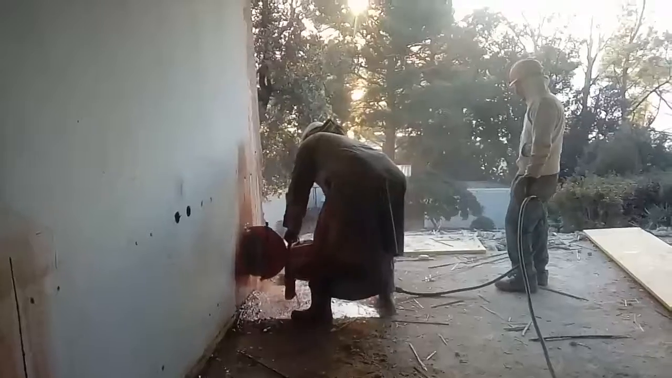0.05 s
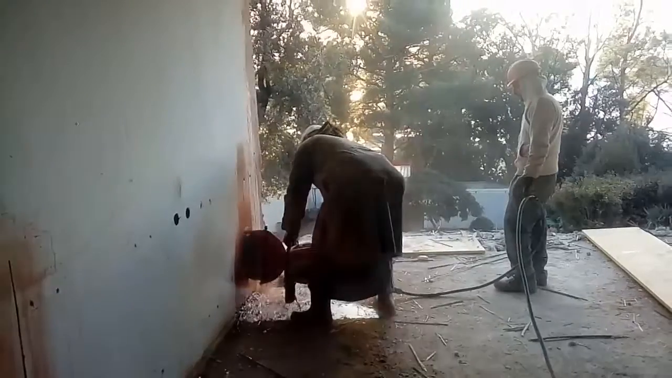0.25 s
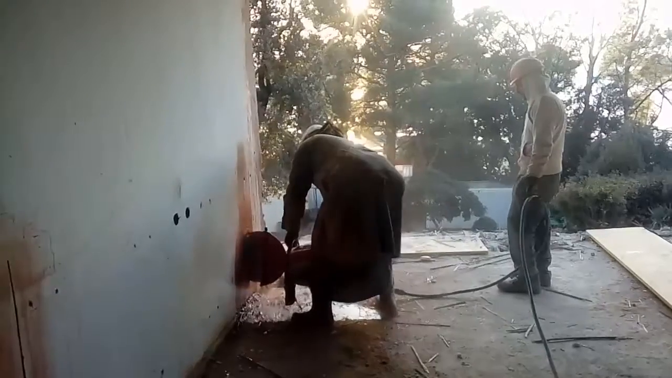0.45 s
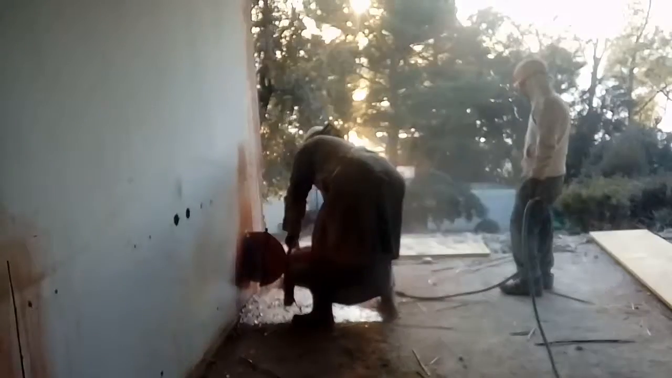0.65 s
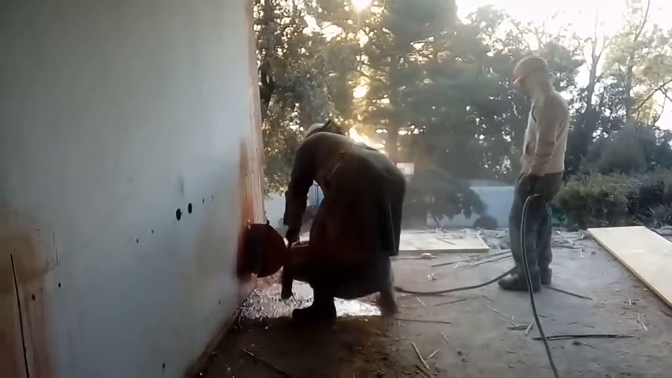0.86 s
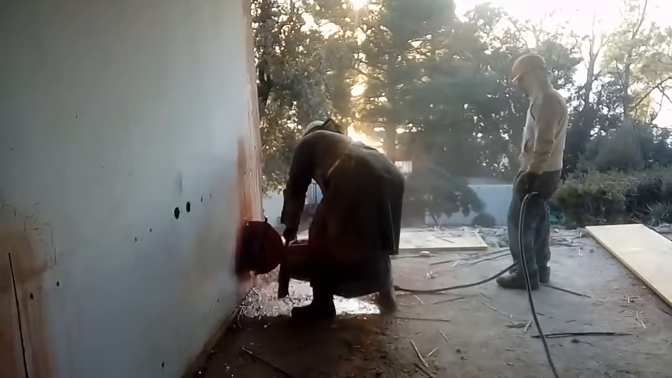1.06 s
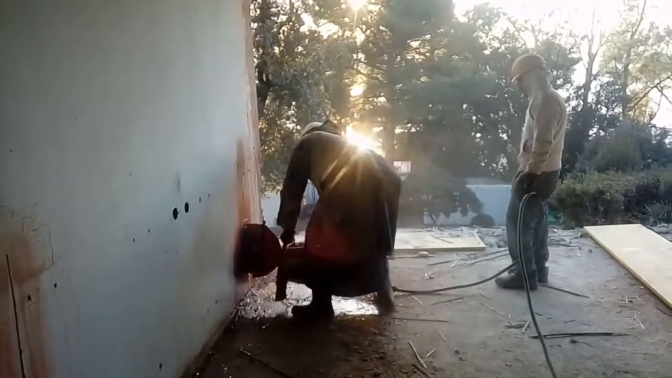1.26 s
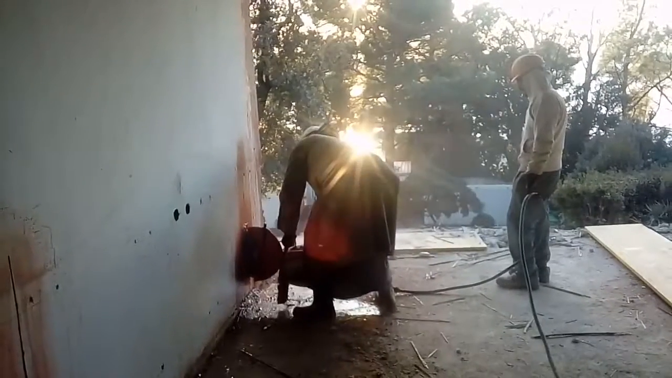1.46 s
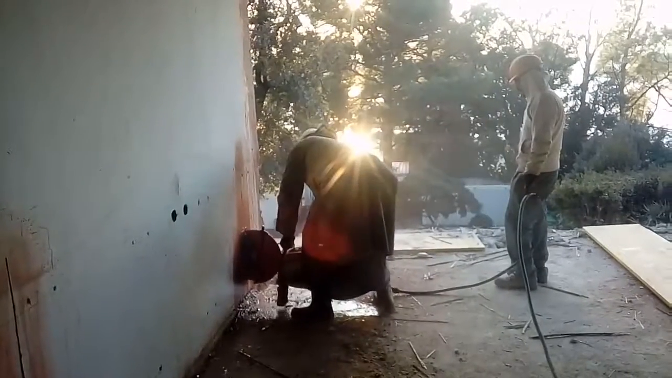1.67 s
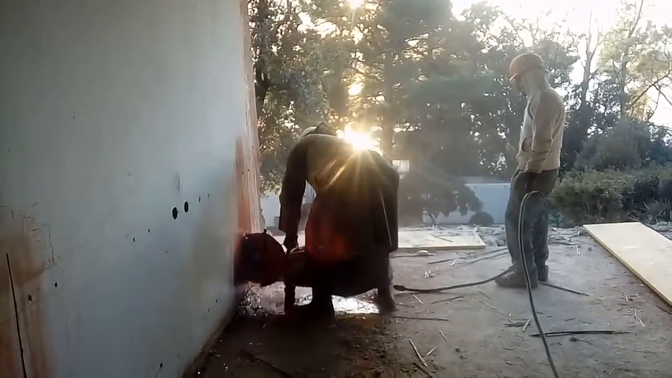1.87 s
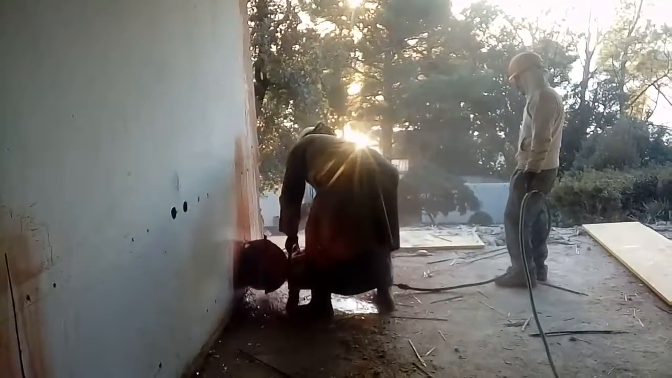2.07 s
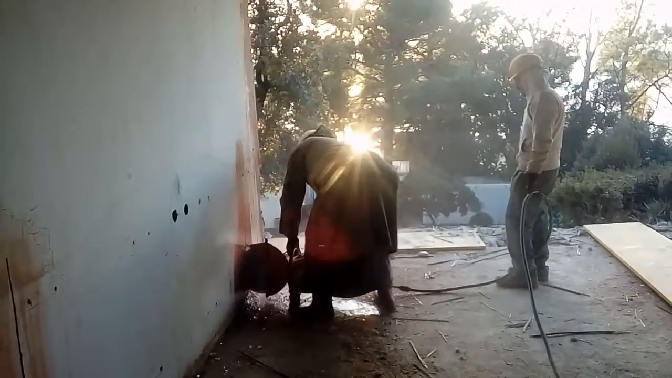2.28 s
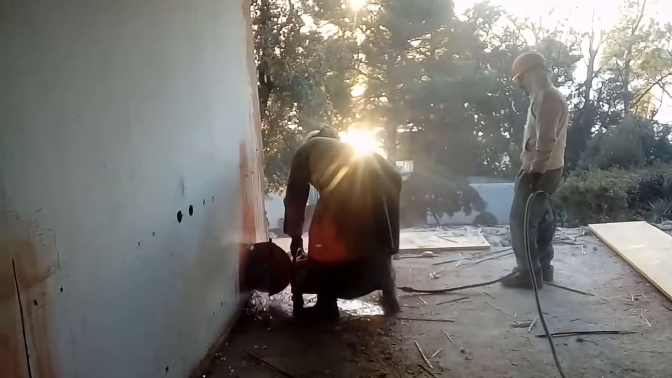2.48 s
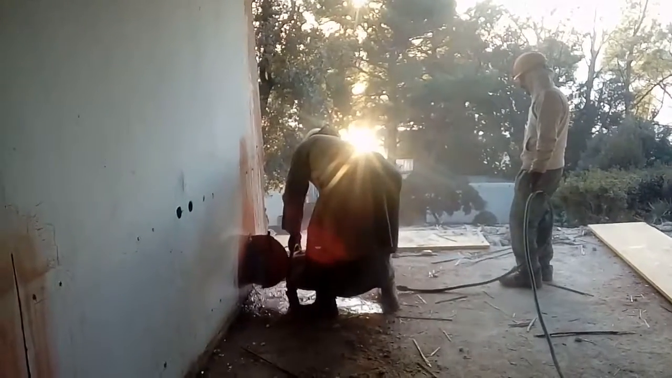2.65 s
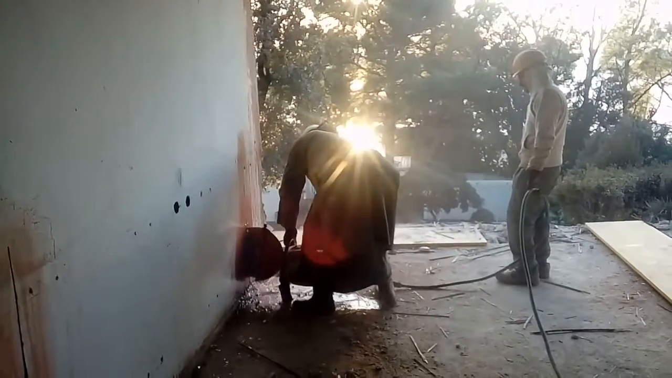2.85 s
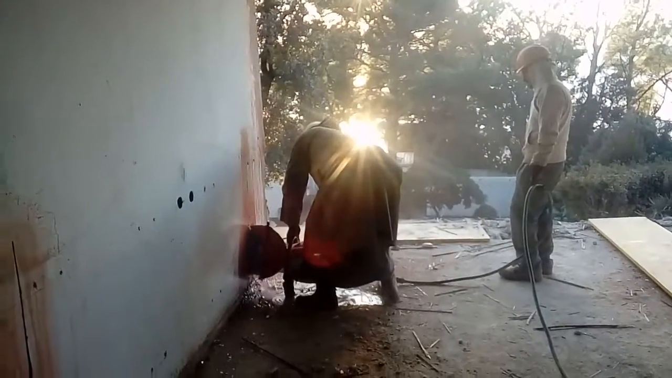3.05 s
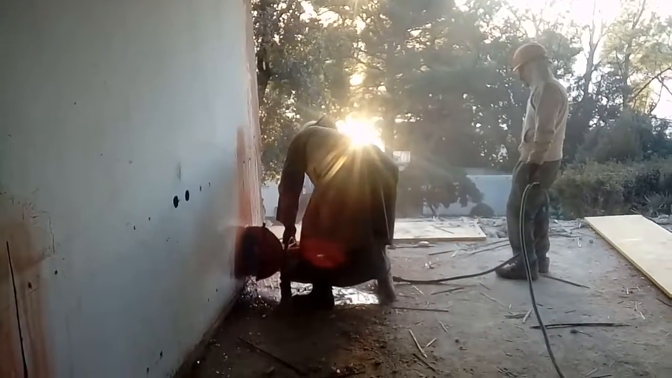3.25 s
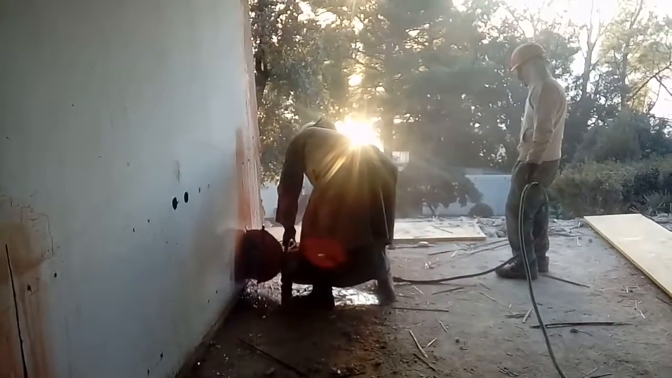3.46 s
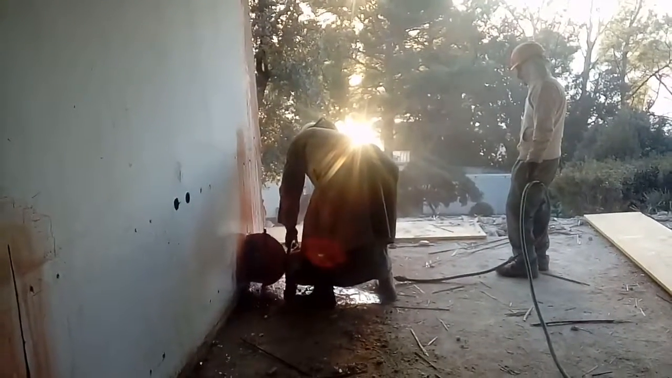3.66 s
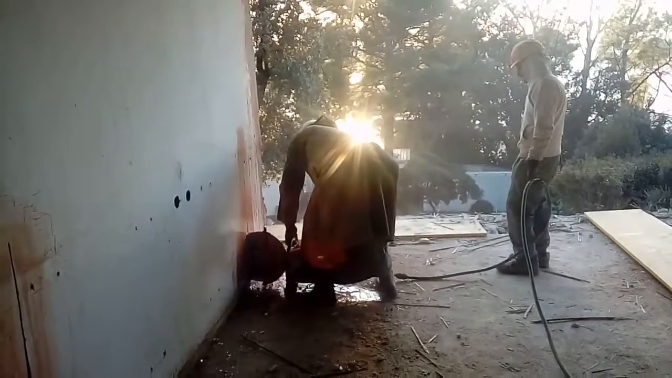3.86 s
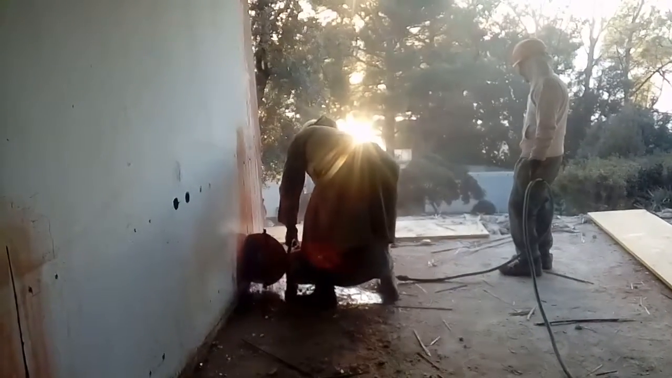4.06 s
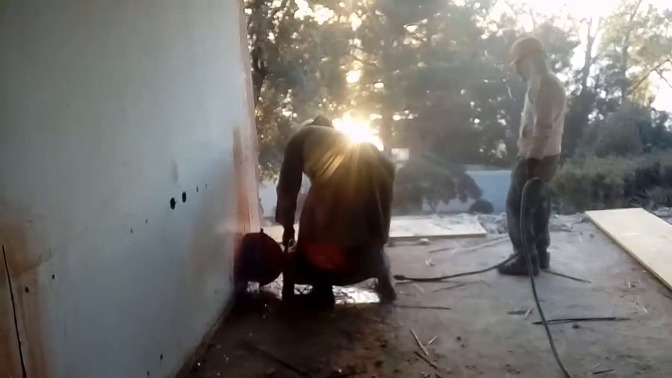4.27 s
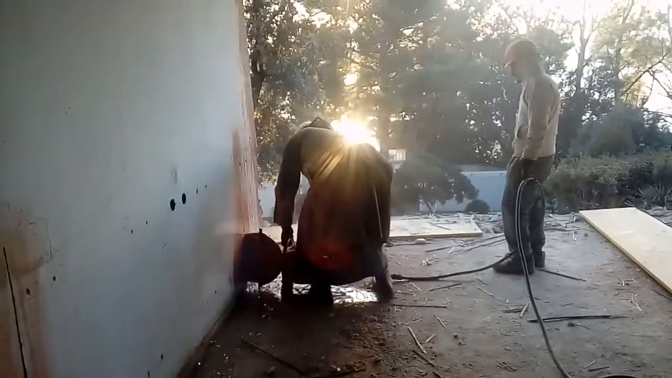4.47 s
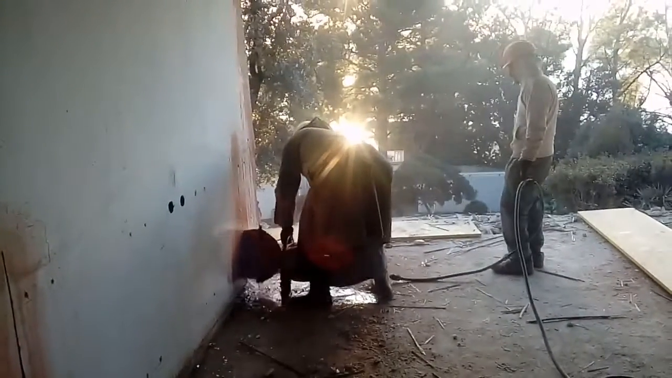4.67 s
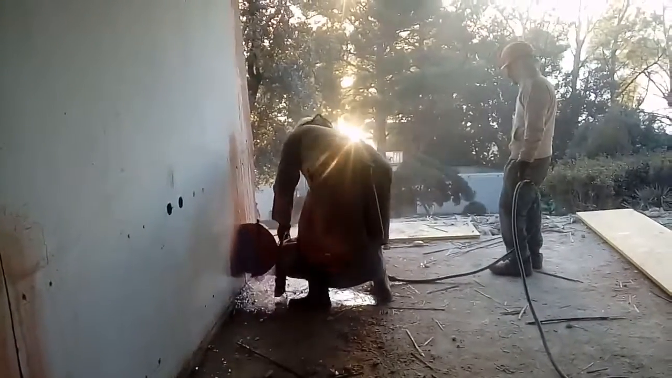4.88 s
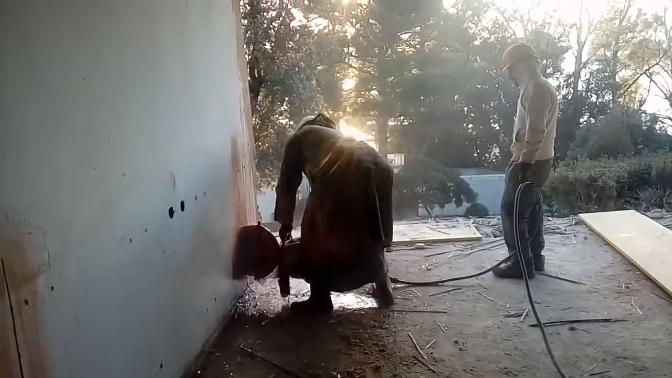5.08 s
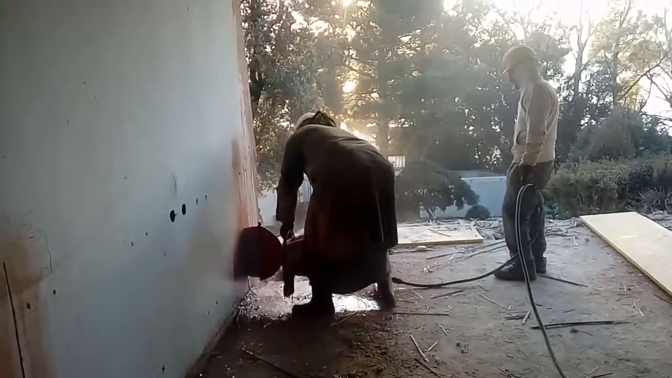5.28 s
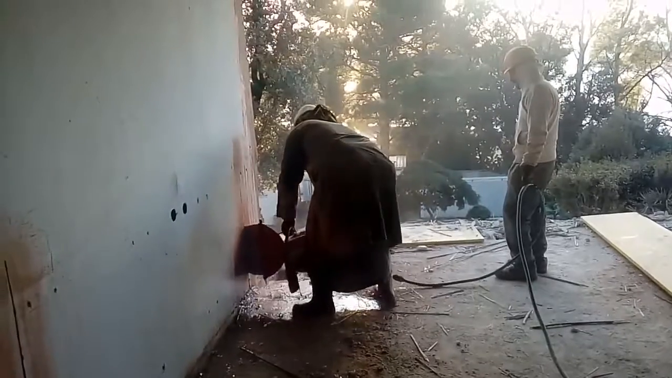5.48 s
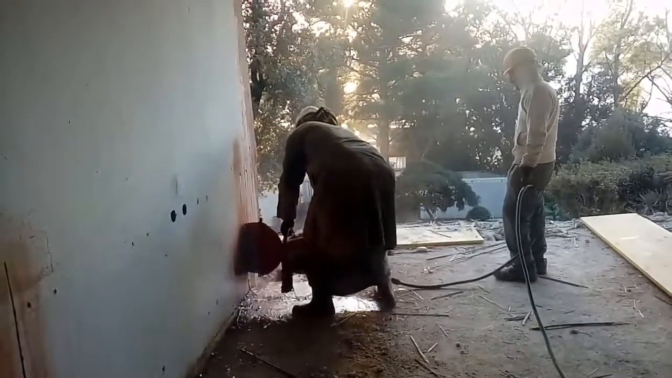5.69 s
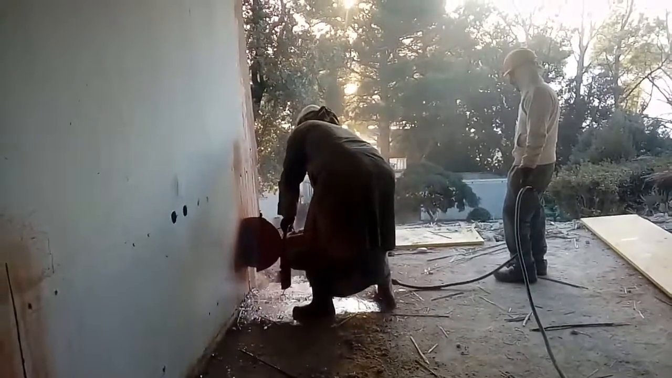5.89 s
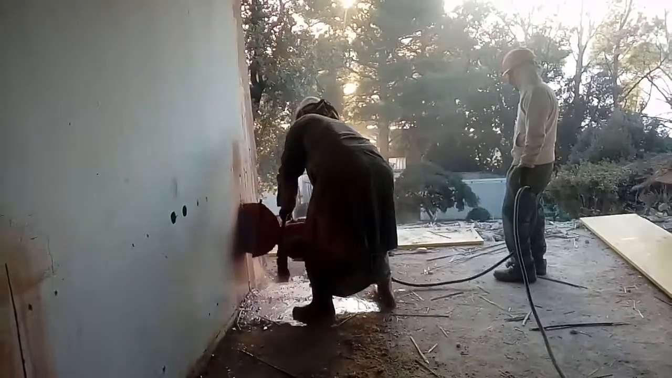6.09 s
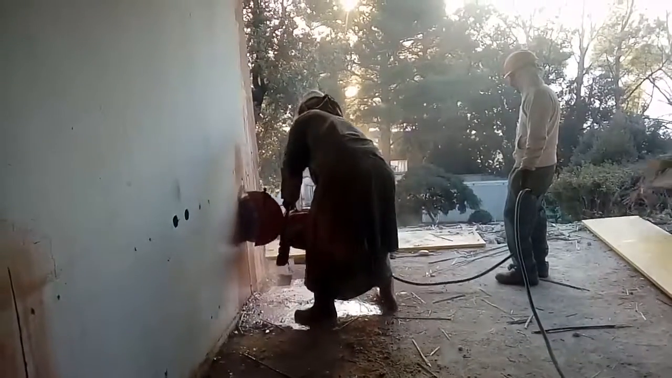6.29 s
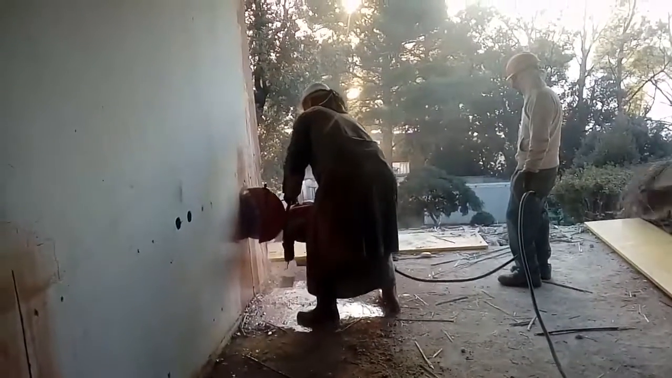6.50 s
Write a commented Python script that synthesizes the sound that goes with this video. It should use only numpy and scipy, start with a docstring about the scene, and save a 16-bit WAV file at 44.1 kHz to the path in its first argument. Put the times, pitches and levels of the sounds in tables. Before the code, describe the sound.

A petrol cut-off saw, a few metres away under a half-open roof, is already cutting concrete. Harsh bright grit and a ringing steel disc ride over rasping exhaust. The engine sags near two seconds, recovers, bogs again before four, then climbs in surges as the push eases and the blade catches in short bites. Short hard echoes; loud, slightly clipped sound.

```python
"""A two-stroke cut-off saw grinds through a concrete wall, a few metres off under a half-open roof.
It fades in mid-cut: grit scrapes the concrete and keeps the steel disc ringing, harder once each disc turn,
over the throb and rasp of the exhaust. The engine sags to its lowest at 2 s, with a few short squeals, and
again before 4 s; then the push eases, the revs climb in surges and the blade catches in brief bites.
Scattered echoes thicken it all along, and the loudest peaks are limited and clipped."""
import sys
import numpy as np
from scipy import signal
from scipy.fft import rfft, irfft
from scipy.io import wavfile
from scipy.ndimage import uniform_filter1d, minimum_filter1d

SR = 44100
rng = np.random.default_rng(int(sys.argv[2]) if len(sys.argv) > 2 else 0)


def generate_wav(signal):
    """Clip the signal to [-1, 1] and save it as 16-bit WAV at the path in sys.argv[1]."""
    frames = np.transpose(np.atleast_2d(signal))
    scaled = np.clip(frames, -1, 1) * 32767
    pcm = np.round(scaled).astype(np.int16)
    wavfile.write(sys.argv[1], SR, pcm)


N = 287961
TIME = np.arange(N) / SR
FREQ = np.maximum(np.fft.rfftfreq(N, 1 / SR), 1)
USUAL_HZ = 100  # engine speed in firings per second at which the levels below hold

# How strongly silencer and corner answer the engine.
# Each row: speed in firings per second [Hz], throb level [dB], exhaust note level [dB].
ENGINE_RESPONSE = [(85, -41, -20.5), (94, -43.5, -23.5), (95.9, -39, -19), (99.6, -43.5, -22.5),
                   (105.5, -37, -22), (113, -33, -26), (126, -33, -26.5), (130, -37, -24)]


def undb(db):
    """Decibels to gain."""
    return 10 ** (np.asarray(db) / 20)


def unit(x):
    """Scale to rms 1."""
    return x / np.sqrt(np.mean(x ** 2))


def curve(table):
    """Points of (s, value) joined by straight lines in time."""
    s, values = np.transpose(table)
    return np.interp(TIME, s, values)


def swell(s, length):
    """A smooth rise and fall centred on time s."""
    return np.exp(-(2 * (TIME - s) / length) ** 2)


def swells(table):
    """The sum of (s, length, dB) swells, in dB."""
    return sum(db * swell(s, length) for s, length, db in table)


def walk(rate):
    """A smooth random wander of rms 1: levels held 1 / rate s and slewed twice."""
    k = max(int(SR / rate), 1)
    steps = np.repeat(rng.standard_normal(N // k + 1), k)
    return unit(uniform_filter1d(uniform_filter1d(steps, k), k)[:N])


def colour(x, points):
    """Filter by a smooth (Hz, dB) spectrum, then scale to rms 1."""
    hz, db = np.transpose(points)
    gain = undb(np.interp(np.log(FREQ), np.log(hz), db))
    return unit(irfft(rfft(x) * gain, N))


def ring(x, modes):
    """Drive a bank of (Hz, width, dB) resonators; neighbouring modes swing in opposite senses."""
    response = 0
    for k, (hz, width, db) in enumerate(modes):
        detuning = (FREQ / hz - hz / FREQ) * hz / width
        response = response + (-1) ** k * undb(db) / (1 + 1j * detuning)
    return unit(irfft(rfft(x) * response, N))


def whine(hz, width):
    """A mode kept ringing by random rubbing; its pitch may move."""
    push = rng.standard_normal(N) + 1j * rng.standard_normal(N)
    swing = signal.lfilter([1], [1, -np.exp(-np.pi * abs(width) / SR)], push)
    return unit(np.real(swing * np.exp(2j * np.pi * np.cumsum(hz) / SR)))


def room(x, wet_db, t60, from_hz, count=4):
    """Direct sound plus scatter from wall, floor and roof; waves below from_hz are hardly scattered."""
    scattered = irfft(rfft(x) / np.sqrt(1 + (from_hz / FREQ) ** 4), N)
    delay = TIME[:SR // 2]
    tails = rng.standard_normal((count, len(delay))) * undb(-60 * delay / t60)
    # the mix of echo paths drifts as the saw moves, 2.5 times a second
    shares = np.array([walk(2.5) for _ in tails])
    shares = shares / np.linalg.norm(shares, axis=0)
    scatter = 0
    for share, tail in zip(shares, tails):
        scatter = scatter + share * signal.fftconvolve(scattered, tail / np.linalg.norm(tail))[:N]
    return unit(x + undb(wet_db) * scatter)


def pressure():
    """Force on the blade in dB against an ordinary cut: the steady push plus each bite."""
    # How hard the blade is pressed in. Each row: time in seconds, push in dB.
    push = [(0.16, -4.5), (0.9, -1.5), (1.12, -6), (1.45, -4), (1.75, 1.5), (2.1, -.5), (2.62, 5.5),
            (2.86, -4.5), (3.05, 3), (3.57, 2.5), (4.08, 1), (4.22, -5), (5.1, -5.5), (5.54, -10),
            (5.96, -6.5), (5.99, 2), (6.53, 0)]
    # The blade catches and bites deeper. Each row: centre in seconds, length in seconds, extra dB.
    catches = [(0.552, 0.15, 3.5), (1.263, 0.14, 5.5), (1.367, 0.064, 3.5), (1.51, 0.053, 3.5),
               (1.907, 0.13, 3), (3.15, 0.06, 5), (4.305, 0.088, 3.5), (4.44, 0.18, 8.5), (4.79, 0.11, 5),
               (4.92, 0.099, 8.5), (5.14, 0.062, 2), (5.357, 0.045, 7.5), (5.731, .12, 4.5),
               (6.016, 0.067, 9), (6.28, 0.072, 6.5), (6.495, .12, 7)]
    return curve(push) + swells(catches)


def bite_gain(turns):
    """The slightly untrue disc, belt-driven, bites harder once a turn and unsteadily in between."""
    belt_ratio = .472  # disc turns per engine turn
    once_a_turn = np.sin(2 * np.pi * belt_ratio * turns)
    return undb(0.75 * once_a_turn + 0.91 * walk(45) + 1.2 * walk(250))


def spiky_noise(bite):
    """A dense stream of noise with uneven spikes, its strength following the bite."""
    return bite * rng.standard_normal(N) * undb(2.0 * rng.exponential(size=N))


def grind(bite, press_db):
    """Diamond grit strikes the concrete; rubbing rings the disc and guard, damped by the wet slot."""
    # Spectrum of grit on concrete. Each row: frequency in Hz, level in dB.
    scrape = [(300, -14.5), (900, -8), (2200, -0.5), (3300, 1), (4700, 1), (6000, 3.5), (7200, 3.5),
              (8200, -9), (9900, -11.5), (10700, -16), (12200, -22), (14000, -39), (16000, -40)]
    # Disc and guard modes. Each row: frequency in Hz, width in Hz, level in dB against the scrape.
    disc = [(2990, 70, -9), (4970, 65, -14), (5640, 100, -10), (5825, 70, -11), (6515, 95, -6),
            (6750, 110, -14), (7200, 60, -13), (7640, 50, -20), (9100, 120, -20), (9890, 130, -24)]
    # each mode swells and fades on its own as the rubbing spot moves
    steel = sum(undb(db + 2.9 * walk(6.6)) * whine(np.full(N, hz), width) for hz, width, db in disc)
    # trim both ends of the spectrum but keep the level
    steel = np.std(steel) * colour(steel, [(300, -20), (2000, 0), (10000, 0), (12000, -12)])
    grit = colour(spiky_noise(bite), scrape)
    return room(grit + bite * steel, wet_db=-7, t60=.2, from_hz=300) * undb(-11 + press_db)


def rim_waves(bite, hz, press_db):
    """Waves run round the disc's rim; spin stiffens it, so they rise in pitch with engine speed."""
    # Rim waves at the usual speed. Each row: frequency in Hz, width in Hz, level in dB before radiation.
    singing = [(3452, 46, 0.5), (3578, 26, 0.5), (3710, 59, -0.5), (3860, 78, -0.5), (3980, 69, -0.5)]
    # Band in which the disc radiates them. Each row: frequency in Hz, level in dB.
    radiation = [(1000, -24), (3200, 1), (3500, 2), (3980, 5), (4180, 4.5), (9000, -30)]
    stiffen = 1 + .1 * (hz / USUAL_HZ - 1)
    waves = sum(undb(db + 1.8 * walk(7)) * whine(f * stiffen, width) for f, width, db in singing)
    sing_db = -14 + 0.75 * press_db + 0.16 * (hz - USUAL_HZ)
    # one higher wave is driven by the cutting itself
    high_wave = whine(4365 * stiffen, width=29) * undb(-24.5 + 1.14 * press_db)
    return colour(waves, radiation) * bite * undb(sing_db) + high_wave


def squeals():
    """The disc binds in the slot and locks onto one mode, which swells and dies away."""
    # Each row: centre in seconds, length in seconds, frequency in Hz, level in dB.
    bindings = [(1.273, 0.091, 2385, -19), (1.862, 0.14, 1936, -16), (3.11, 0.37, 3500, -14),
                (4.42, 0.21, 3760, -10), (5.516, 0.13, 3840, -18), (5.885, 0.071, 1700, -19.5),
                (6.327, 0.094, 3500, -13)]
    out = np.zeros(N)
    for s, length, hz, db in bindings:
        wavering_hz = hz * (1 + 0.0065 * walk(120))
        tone = unit(np.sin(2 * np.pi * np.cumsum(wavering_hz) / SR))
        out += swell(s, length) * undb(db) * tone
    return out


def firing_pulses(turns):
    """A two-stroke fires once a turn, a little uneven in timing and strength."""
    count = np.arange(1, int(turns[-1]))
    chance = rng.standard_normal((len(count), 2))
    at = np.interp(count + .0055 * chance[:, 0], turns, np.arange(N))
    size = undb(.8 * chance[:, 1])
    # share each pulse between the two nearest samples
    whole, part = np.clip(at.astype(int), 0, N - 2), at % 1
    return np.bincount(whole, size * (1 - part), N) + np.bincount(whole + 1, size * part, N)


def exhaust_rasp(firings, gas, revs, press_db):
    """The exhaust port opens with a crack of wavering strength, mixed with the hiss of turbulent gas."""
    # Blow-down spectrum at the port. Each row: frequency in Hz, level in dB.
    blow_down = [(200, -45), (320, -26), (500, -10.5), (680, -5.5), (900, -6.5), (1300, -8), (1550, -2.5),
                 (2150, -2), (2650, -6), (3200, -2), (4500, -17.5), (7000, -21), (9000, -51), (15000, -60)]
    # The rasp swells or dips. Each row: centre in seconds, length in seconds, extra dB.
    rasp_swells = [(0.92, .2, 1), (2.35, .45, -3.5), (2.87, .12, -1.5), (3.3, .3, 2), (3.92, 0.074, 3),
                   (4.7, .12, -0.5), (5.24, 0.076, 1), (5.62, 0.34, -2.5), (6.06, .1, 5.5)]
    crack = room(colour(firings, blow_down), wet_db=13, t60=0.36, from_hz=300) * undb(1.4 * walk(5.4))
    rasp = unit(crack + undb(-2.0) * colour(gas, blow_down))
    return rasp * undb(-13 + 0.11 * revs + 0.21 * press_db + swells(rasp_swells))


def exhaust_note(firings, gas, revs, note_db):
    """Firings ring the silencer and nearby walls; churning gas roughens the note as the revs rise."""
    # Resonances of silencer and walls. Each row: frequency in Hz, width in Hz, level in dB.
    silencer = [(524.2, 21.6, -1), (569, 10.5, -4), (636, 32, -2), (684.2, 14.4, 6), (717.7, 8.3, 1.5),
                (762.4, 23.7, 5.5), (837, 65, -3.5), (936, 21, -1.5), (1005, 86, -33), (1352, 41, -6)]
    churn = colour(gas, [(300, -30), (560, -14), (660, 0), (20000, 0)])
    churn = churn * undb(-6 + .35 * np.minimum(revs, 16))
    note = room(ring(unit(firings) + churn, silencer), wet_db=-1.5, t60=0.45, from_hz=880)
    # it flares and fades as the saw moves against the wall
    return note * undb(1.0 * walk(16) + note_db)


def throb(turns, throb_db):
    """A low fluttering sine, one cycle a turn, that swells for moments."""
    # Each row: centre in seconds, length in seconds, extra dB.
    booms = [(0.3, .16, 6), (1.0, 0.097, 7), (1.62, 0.13, 6), (2.62, 0.14, 5), (4.58, .2, 8), (4.9, .12, 8),
             (5.22, 0.098, 6)]
    flutter = unit(np.sin(2 * np.pi * turns) * undb(1.6 * walk(30)))
    return flutter * undb(throb_db + swells(booms))


def drone(firings, revs):
    """Firings ring the low resonances of the corner the saw stands in, louder with the revs."""
    # Each row: frequency in Hz, width in Hz, level in dB.
    corner = [(180, 12.3, -4.5), (250.6, 17, -11.5), (283.7, 20, -5.5), (357.7, 11.7, -1.5),
              (432.6, 20, 1.5)]
    return ring(firings, corner) * undb(-36.5 + 0.22 * revs + 1.3 * walk(9))


def engine(turns, hz, press_db):
    """One train of firings feeds the rasp, the note and the drone; the throb keeps step."""
    revs = hz - USUAL_HZ  # firings per second above the usual speed
    speed_hz, *answers = np.transpose(ENGINE_RESPONSE)
    throb_db, note_db = (np.interp(hz, speed_hz, db) for db in answers)
    firings = firing_pulses(turns)
    # turbulent gas bursts at each turn and dies down to a steady rush
    gas = unit((np.exp(-(turns % 1) / 0.41) + 0.71) * rng.standard_normal(N))
    exhaust = exhaust_rasp(firings, gas, revs, press_db) + exhaust_note(firings, gas, revs, note_db)
    return exhaust + throb(turns, throb_db) + drone(firings, revs)


def overload_hiss(bite, press_db):
    """A thin flickering hiss near 15 kHz from the overloaded recorder, rising faster than the cut's level."""
    # Each row: frequency in Hz, level in dB.
    spectrum = [(4000, -40), (11000, -9), (13900, -5), (14600, 2), (16000, -4.5)]
    return colour(spiky_noise(bite), spectrum) * undb(-36.5 + 1.75 * press_db + 3.9 * walk(400))


def low_noise(press_db):
    """Faint low noise, likely the recorder's limiter straining, that grows steeply with the cut."""
    noise = colour(rng.standard_normal(N), [(15, 15), (60, 14), (150, 8), (400, -30), (2000, -60)])
    return noise * undb(-57 + 2.1 * press_db + 2.0 * walk(14))


def scene():
    """The crankshaft fires the exhaust and turns the disc by belt; speed and pressure steer the levels."""
    # Engine speed, sagging under load and recovering. Each row: time in seconds, firings per second in Hz.
    speed = [(0.16, 100), (0.6, 93.1), (0.98, 104.9), (1.26, 105.8), (1.49, 101), (1.86, 86.9),
             (1.99, 85.27), (2.38, 101.1), (2.87, 109.2), (3.17, 104.3), (3.44, 92.9), (3.83, 91.04),
             (4.05, 98.4), (4.29, 115), (4.42, 117.7), (4.56, 117.7), (4.68, 109.0), (4.97, 127.4),
             (5.06, 114.2), (5.34, 130.5), (5.77, 111.3), (5.98, 116.5), (6.07, 109), (6.23, 119.1),
             (6.33, 103), (6.53, 113)]
    hz = curve(speed)
    press_db = pressure()
    turns = np.cumsum(hz * (1 + .0015 * walk(25))) / SR
    bite = bite_gain(turns)
    blade = grind(bite, press_db) + rim_waves(bite, hz, press_db) + squeals()
    background = overload_hiss(bite, press_db) + low_noise(press_db)
    saw = blade + engine(turns, hz, press_db) + background
    # silent at first, then in at 0.13 of full size and up to full over 0.24 s
    start_s, fade_s = 0.155, 0.24
    fade = np.interp(TIME, [start_s, start_s + fade_s], [0.13, 1], left=0)
    return (saw * fade)[None]


def record(dry):
    """A fast limiter holds the peaks, what overshoots is clipped, and a steep low-pass cuts the top."""
    ceiling, top_hz = 1.01, 15700
    needed = ceiling / np.maximum(np.abs(dry), ceiling)
    gain = uniform_filter1d(minimum_filter1d(needed, size=29), size=33)
    low_pass = signal.ellip(10, .1, 80, top_hz, fs=SR, output="sos")
    return signal.sosfilt(low_pass, np.clip(dry * gain, -1, 1))


dry = scene()
out = record(dry)
generate_wav(out)
```